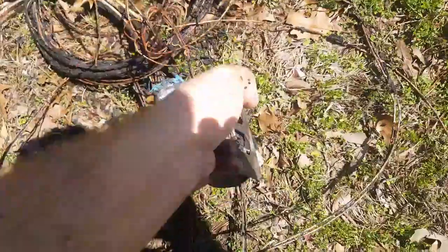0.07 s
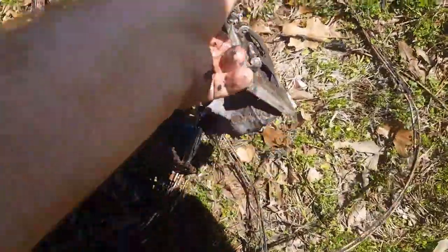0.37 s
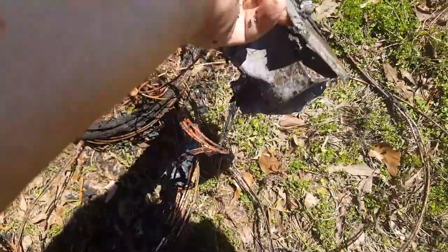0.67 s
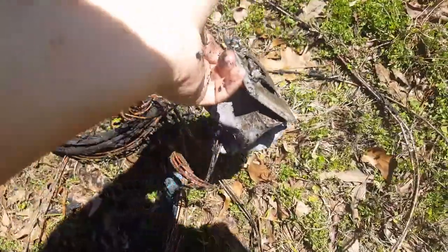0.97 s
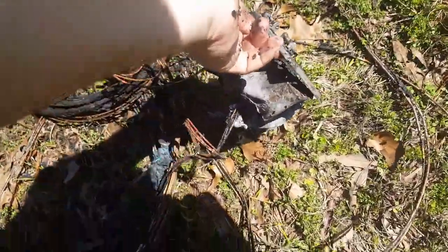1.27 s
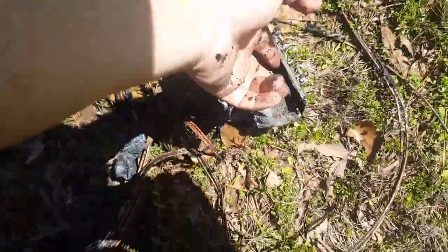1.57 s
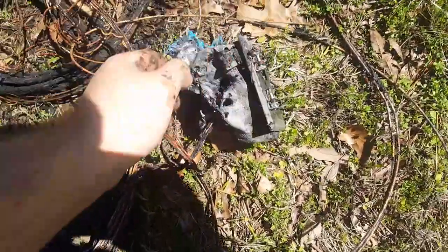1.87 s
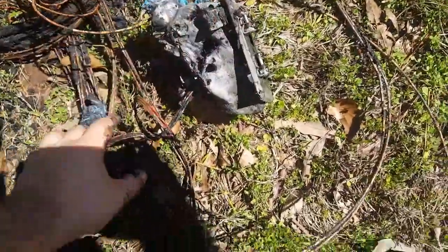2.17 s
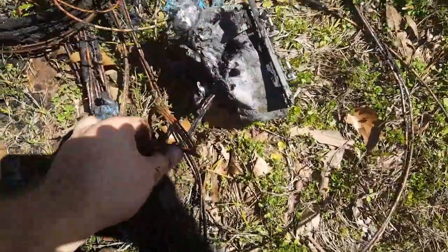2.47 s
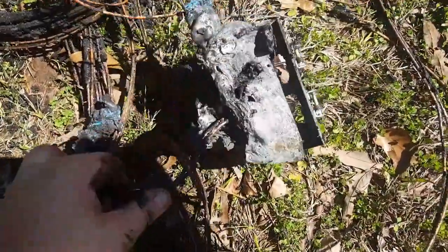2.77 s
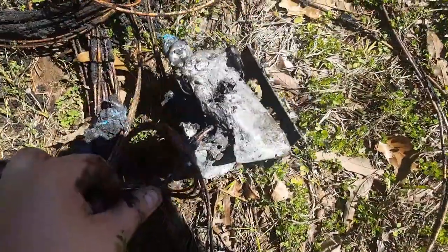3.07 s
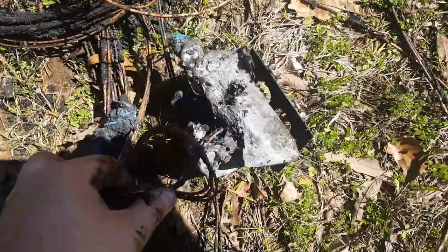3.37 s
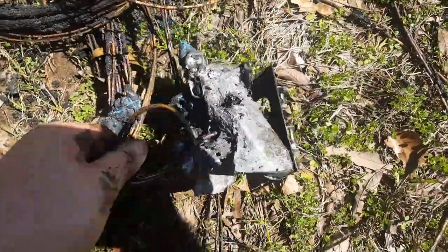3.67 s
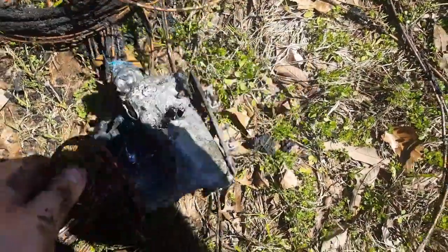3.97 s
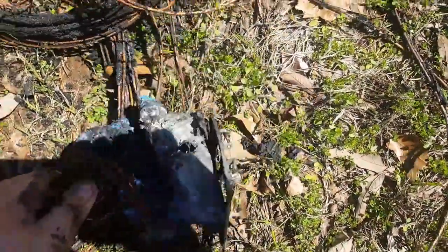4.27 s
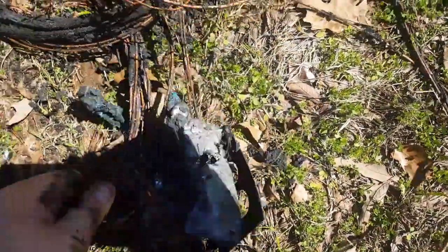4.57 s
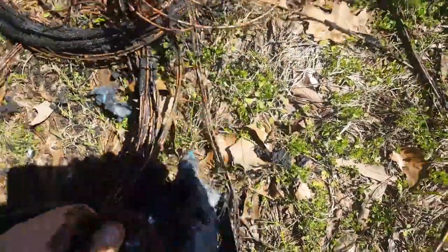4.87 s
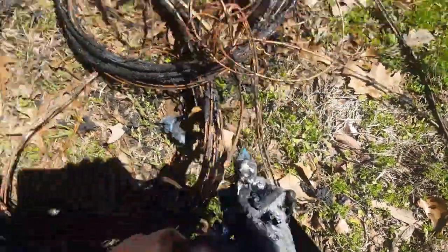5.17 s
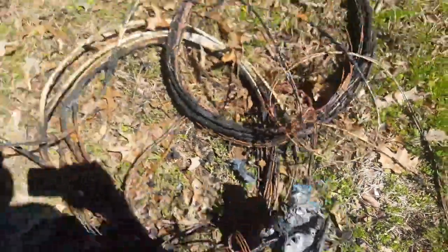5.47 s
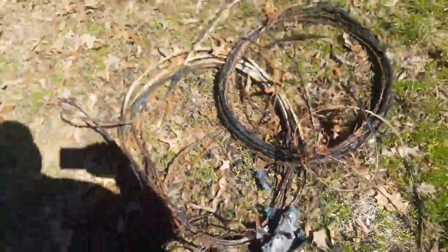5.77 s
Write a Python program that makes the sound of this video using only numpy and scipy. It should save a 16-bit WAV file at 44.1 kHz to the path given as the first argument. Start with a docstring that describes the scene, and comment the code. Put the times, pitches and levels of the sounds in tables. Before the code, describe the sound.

Close up outdoors, a stiff burnt cable and a charred metal box are moved over dry leaves and grass, with light rustling, thin crackles, a faint scrape and soft thuds. The cable is then twisted, and its brittle crust snaps and crumbles in a loud, dense run that makes the box ring briefly. Finally it drops into the leaves with a crunch. A light breeze rumbles on the microphone throughout.

```python
"""Burnt cable on dry leaves

A stiff, burnt cable and the charred metal box at its end are handled on dry leaves and grass, up close.
Leaves rustle and stalks splinter; the box scrapes and rings as it is set down, amid soft thuds.
The cable is twisted: its brittle crust snaps and crumbles, ringing the box. Then it drops into the leaves.
A light breeze rumbles on the microphone throughout."""
import sys
import numpy as np
from scipy import signal
from scipy.fft import rfft, irfft, next_fast_len
from scipy.io import wavfile
from scipy.ndimage import uniform_filter1d, map_coordinates

SR = 44100
rng = np.random.default_rng(int(sys.argv[2]) if len(sys.argv) > 2 else 0)


def wav_out(sig):
    """Save sig, one row per channel (or a flat mono array), as 16-bit PCM at SR to the path in sys.argv[1]."""
    wavfile.write(sys.argv[1], SR, np.round(np.clip(np.atleast_2d(sig).T, -1, 1) * 32767).astype(np.int16))


N = 265173
HIT_SAMPLES = 8192

# Fine treble of leaves and crust. Each row: frequency in Hz, relative level in dB.
CRISP_SPECTRUM = [(3400, -25), (4400, -1), (5500, -4), (7300, -8.5), (9200, -6.5), (11000, -9.5),
                  (13500, -8.5), (15000, -10)]
# The bright edge of a crack or scrape. Each row: frequency in Hz, bandwidth in Hz, relative level in dB.
CRACK_MODES = [(5050, 2100, 8), (10100, 930, 2.5), (13600, 1600, -1.5)]
# The ring of the crusted box. Each row: frequency in Hz, bandwidth in Hz, relative level in dB.
BOX_MODES = [(1250, 64, -6), (1649, 172, -2), (1870, 113, 1), (2232, 123, -2.5), (2536, 176, -9),
             (3380, 610, -13), (4074, 105, -7.5)]
# The knock of its broad panels. Each row: frequency in Hz, bandwidth in Hz, relative level in dB.
PANEL_MODES = [(210, 50, -17), (380, 140, -15), (670, 100, 0), (1000, 380, -4)]


def amp(db):
    """Decibels to gain."""
    return 10 ** (np.asarray(db) / 20)


def unit(x):
    """Scale to rms 1."""
    return x / np.sqrt(np.mean(x ** 2) + 1e-20)


def wobble(rate):
    """A smooth random curve with `rate` knots a second."""
    return map_coordinates(rng.standard_normal(int(N * rate / SR) + 4), [np.arange(N) * rate / SR])


def pan(db):
    """Channel gains for a left-right level difference; negative leans right."""
    return amp([[db / 2], [-db / 2]])


def filtered(x, response):
    """Filter x by a complex response, given as a function of Hz."""
    size = x.shape[-1]
    padded = next_fast_len(size + HIT_SAMPLES)
    return irfft(rfft(x, padded) * response(np.fft.rfftfreq(padded, 1 / SR)), padded)[..., :size]


def left_first(x, lead_ms):
    """Let the sound reach the left channel just ahead of the right."""
    return filtered(x, lambda hz: np.exp(2j * np.pi * hz * lead_ms / 1000 * np.array([[.5], [-.5]])))


def equalised(x, curve):
    """Shape x with an EQ curve of (Hz, dB) points."""
    hz, db = np.transpose(curve)
    return filtered(x, lambda f: amp(np.interp(np.log(f + 1), np.log(hz), db)))


def ring(x, modes, vary_db=0, detune=0):
    """Ring resonances with x, at rms 1; scatter in strength and pitch stands for the point struck."""
    chance = rng.standard_normal((len(modes), 2))
    struck = [(hz * np.exp(detune * a), width, amp(db + vary_db * b))
              for (hz, width, db), (a, b) in zip(modes, chance)]
    return unit(filtered(x, lambda f: sum(
        (-1) ** k * gain * 1j * f * width / (hz * hz - f * f + 1j * f * width)
        for k, (hz, width, gain) in enumerate(struck))))


def noise(alike):
    """Stereo white noise; `alike` is the share of power common to both channels."""
    return np.sqrt(alike) * rng.standard_normal(N) + np.sqrt(1 - alike) * rng.standard_normal((2, N))


def grains(rate, spread_db, clump_db, bed_db, alike):
    """Tiny fractures, about `rate` a second and a millisecond each, clumping over a bed of hiss."""
    size_db = spread_db * np.minimum(rng.exponential(size=N), 3)
    starts = (rng.random(N) < rate / SR) * amp(size_db)
    energy = signal.lfilter([1], [1, -np.exp(-1 / (0.00049 * SR))], starts ** 2)
    envelope = np.hypot(unit(np.sqrt(energy)), amp(bed_db))
    return unit(envelope * noise(alike) * amp(clump_db * wobble(70)))


def jolt(run_t60, run_db, shiver_t60, shiver_db):
    """The force of one break or scrape: a sharp release, a ragged run and a shiver of loose bits."""
    t = np.arange(HIT_SAMPLES) / SR
    release = 1. * (t == 0)
    ragged = amp(4 * np.repeat(rng.standard_normal(HIT_SAMPLES // 32), 32))
    build_up = 1 - np.exp(-t / (0.061 * run_t60))
    run = ragged * rng.standard_normal(HIT_SAMPLES) * amp(-60 * t / run_t60) * build_up
    shiver = rng.standard_normal((2, HIT_SAMPLES)) * amp(-60 * t / shiver_t60)
    return unit(release) + amp(run_db) * unit(run) + amp(shiver_db) * unit(shiver)


def add(track, start, sound, db):
    """Mix a sound in at `start` seconds, its loudest 3 ms at the given level."""
    loudest = np.sqrt(uniform_filter1d(np.mean(sound ** 2, axis=0), size=130, mode="constant").max())
    part = track[:, round(start * SR):][:, :sound.shape[-1]]
    part += (amp(db) * sound / loudest)[:, :part.shape[-1]]


def gestures(rows, attack_db_per_s=257, release_db_per_s=208):
    """Gain of a run of moves: each sets in fast, fades (swells if its fade is negative), then dies."""
    t, power = np.arange(N) / SR, np.zeros(N)
    for start, length, db, fade in rows:
        before = np.maximum(start - t, 0)
        during = np.clip(t - start, 0, length)
        after = np.maximum(t - start - length, 0)
        power += amp(db - attack_db_per_s * before - fade * during - release_db_per_s * after) ** 2
    return np.sqrt(power)


def cable_motion():
    """How hard the cable stirs the leaves and how hard its crust is worked; the final drop does both."""
    # Pulls through the leaves, and twists that crumble the crust.
    # Each row: start in seconds, length in seconds, drive in dB, fade in dB per second.
    pulls = [(0, 0.758, -46.5, 7), (.86, 0.36, -51.5, 3.5), (1.34, .36, -60, -17), (1.82, 0.15, -51, 23),
             (2.22, .2, -61, 16), (2.51, 0.49, -51.5, -4), (3.05, 0.31, -60, 4), (3.61, 1.45, -47, 0.5),
             (5.12, 0.27, -51, 0.5)]
    twists = [(3.92, 0.1, -37.5, 12), (4.12, 0.44, -38, 8.5), (4.59, 0.21, -33, 7),
              (4.88, 0.047, -38.5, 25)]
    drop_s, rise_db_per_s, fall_db_per_s = 5.637, 105, 61
    since_drop = np.arange(N) / SR - drop_s
    drop = amp(-37.5 - np.maximum(-rise_db_per_s * since_drop, fall_db_per_s * since_drop))
    resting = amp(-61)
    stir = np.sqrt(gestures(pulls) ** 2 + drop ** 2 + resting ** 2)
    twist = np.hypot(gestures(twists), amp(-17) * drop)
    return stir, twist


def rustle(drive):
    """Dry leaves crackle and bare wire strands tick as the cable moves."""
    # The body of the leaves. Each row: frequency in Hz, relative level in dB.
    leaf_spectrum = [(450, -24), (800, -13), (1200, -4), (1800, 1), (2400, -1), (3000, -4), (3750, -2),
                     (4500, -9), (5500, -24), (9000, -60)]
    # The ring of the strands. Each row: frequency in Hz, bandwidth in Hz, relative level in dB.
    wire_modes = [(1155, 130, 3), (1810, 120, 7.5), (2660, 133, 6.5), (3655, 140, 2.5)]
    leaf_grains = grains(rate=700, spread_db=3.8, clump_db=1.7, bed_db=0, alike=.25)
    wire_grains = grains(rate=110, spread_db=3.5, clump_db=2.5, bed_db=-7, alike=.15)
    fine_grains = grains(rate=170, spread_db=3, clump_db=1.16, bed_db=4.5, alike=0.014)
    leaves = unit(equalised(leaf_grains, leaf_spectrum)) * pan(-5)
    wires = ring(wire_grains, wire_modes) * pan(-5)
    crisp = unit(equalised(fine_grains, CRISP_SPECTRUM)) * pan(-7)
    return drive * (amp(1.5) * leaves + amp(-6) * wires + crisp)


def hand_rub(effort):
    """Dull friction of hand on cable, growing 0.43 dB for each dB of effort."""
    # The low colour of the rubbing. Each row: frequency in Hz, relative level in dB.
    rub_spectrum = [(60, -14), (110, -1.5), (170, -5), (260, -4.5), (340, -2), (500, -8.5), (720, -6),
                    (950, -8), (1400, -31)]
    rub_db = -56.5 + 0.43 * (20 * np.log10(effort) + 48)
    friction = grains(rate=210, spread_db=6, clump_db=2, bed_db=1.5, alike=0.72)
    return amp(rub_db) * unit(equalised(friction, rub_spectrum)) * pan(-0.1)


def breeze():
    """Light air rumbles on the microphone: a wavering rumble that swells three times as the microphone is
    moved."""
    # The rumble of the air. Each row: frequency in Hz, relative level in dB.
    wind_spectrum = [(12, -37), (25, -5), (40, 2.5), (65, 2), (90, 1), (130, -3), (200, -11.5),
                     (350, -34.5)]
    # Each row: start in seconds, length in seconds, swell strength in dB, fade in dB per second.
    swells = [(.5, 0.75, -55.5, 4.5), (1.48, .3, -62.5, 10), (5.3, .4, -52, 2)]
    rumble = unit(equalised(noise(alike=0.4), wind_spectrum))
    waver = amp(2 * wobble(5))
    return np.hypot(amp(-62), gestures(swells)) * rumble * waver * pan(-3)


def stalk_ticks():
    """Dry stalks and leaves splinter with thin, short crackles."""
    # Each row: start in seconds, level in dB, crack against stalk in dB, splintering t60 in seconds.
    breaks = [(0.044, -31.5, -0.5, 0.01), (.272, -35, 7, 0.0096), (.293, -38, 1, 0.13),
              (.983, -45, -16, 0.031), (1.086, -39, -2, 0.011), (1.143, -42, 1, .026), (1.187, -50, 9, .02),
              (1.247, -44.5, 3, .02), (1.335, -43.5, -12, 0.011), (1.625, -40.5, -5, 0.11),
              (1.662, -33, 6, 0.01), (1.668, -27.5, -10, 0.0032), (1.869, -39.5, 2, .017),
              (1.889, -35, -8.5, 0.011), (2.232, -42.5, -7.5, .055), (2.286, -47, -15, 0.026),
              (2.326, -39.5, -22, 0.014), (2.69, -36.5, 0, 0.091), (2.786, -37.5, -6, 0.0095),
              (2.909, -32.5, 3, 0.017), (2.94, -31, 1, 0.02), (3.135, -38.5, -6, 0.0058),
              (3.3, -47, -13, 0.023), (5.044, -37.5, 4, 0.027), (5.604, -29, -31, 0.018),
              (5.631, -30, -9, .018), (5.675, -23, -3, 0.068)]
    # The ring of a dry stalk. Each row: frequency in Hz, bandwidth in Hz, relative level in dB.
    stalk_modes = [(1350, 500, -5), (1850, 450, 0), (2550, 600, -1), (3800, 900, -3)]
    out = np.zeros((2, N))
    for start, db, crack_db, run_t60 in breaks:
        force = jolt(run_t60, run_db=4, shiver_t60=0.086, shiver_db=-1)
        stalk = ring(force, stalk_modes, vary_db=3, detune=.08)
        crack = amp(crack_db) * ring(force, CRACK_MODES, vary_db=6, detune=0.113) * pan(-1)
        add(out, start, (stalk + crack) * pan(-9.5), db)
    return out


def box_slide():
    """The box scrapes over the ground, and the friction sounds its hollow."""
    # Each row: start in seconds, length in seconds, level in dB, fade in dB per second.
    slides = [(.22, 0.42, -54.5, 9), (1.04, 0.32, -56.5, 32), (1.82, 0.17, -56, 13)]
    # The hollow of the box. One row: frequency in Hz, bandwidth in Hz, relative level in dB.
    hollow = [(322, 194, 0)]
    scrape = grains(rate=180, spread_db=5, clump_db=2, bed_db=4, alike=0.95)
    return gestures(slides) * ring(ring(scrape, hollow), hollow)  # twice, for steeper skirts


def soft_bumps():
    """Hand, box and ground meet softly: a damped low mode and one brief overtone."""
    # Each row: start in seconds, level in dB, pitch in Hz, t60 of the low mode in seconds.
    contacts = [(1.032, -43.5, 430, .017), (1.065, -39.5, 105, 0.16), (1.386, -50, 405, 0.021),
                (1.832, -40, 640, 0.017), (1.889, -41.5, 745, 0.022), (2.234, -40.5, 875, 0.0087),
                (2.347, -44, 616, 0.0027), (3.984, -32, 430, 0.013), (4.168, -44.5, 210, .056),
                (4.334, -42.5, 199, .1), (4.659, -42, 220, 0.07), (4.022, -44, 564, .015),
                (4.591, -35, 473, 0.012), (4.78, -44, 184, 0.11), (4.923, -36, 401, 0.028),
                (5.419, -38.5, 870, 0.0093), (5.68, -39.5, 244, 0.048), (5.8941, -30, 428, 0.014)]
    out, t = np.zeros((2, N)), np.arange(HIT_SAMPLES) / SR
    attack = 1 - np.exp(-t / 0.00096)
    for start, db, hz, t60 in contacts:
        phase = 2 * np.pi * hz * t
        overtone = amp(8.5 - 60 * t / 0.01) * np.sin(2.41 * phase)
        thud = (np.sin(phase) + overtone) * amp(-60 * t / t60) * attack
        add(out, start, thud * pan(-7), db)
    return out


def scrapes_and_snaps():
    """The box scrapes and rings as it is set down; later its crust snaps and crunches."""
    # Two scrapes of the box, then the snaps of the crust.
    # Each row: start in seconds, level in dB, trim of the bright edge in dB, t60 of the run in seconds.
    hits = [(1.614, -40.5, -9, 0.077), (1.67, -34.5, -5, 0.0077), (3.801, -30.5, -25, 0.024),
            (3.864, -31.5, -27, 0.031), (3.884, -24, -29, 0.0077), (3.939, -11, -23, 0.0066),
            (3.986, -25, -29, 0.037), (4.006, -19, -9, 0.0064), (4.022, -13.5, -27, 0.024),
            (4.038, -20, -29, .01), (4.086, -26, -9, 0.027), (4.12, -13.5, -8, 0.022),
            (4.168, -15, -7, 0.0073), (4.19, -24.5, -24, 0.017), (4.201, -21.5, -31, 0.0064),
            (4.238, -21, -11.5, 0.024), (4.246, -23, -6, .013), (4.267, -15, -11.5, 0.042),
            (4.29, -17, -10, 0.014), (4.332, -15, -12, 0.0079), (4.387, -21.5, -17, 0.045),
            (4.422, -11, -13, 0.011), (4.437, -21, -10, 0.016), (4.469, -23.5, -7, 0.03),
            (4.534, -22, -12, 0.0052), (4.589, -15.5, -14, 0.028), (4.616, -22.5, -1, 0.024),
            (4.66, -13, -12, 0.0044), (4.685, -30, 1, 0.049), (4.715, -21.5, -4, 0.029),
            (4.749, -13.5, -11.5, 0.021), (4.761, -15.5, -9, 0.0098), (4.776, -18.5, -11, 0.017),
            (4.784, -23, -6, 0.012), (4.799, -20, -8, 0.01), (4.807, -15, -20, 0.0046),
            (4.923, -15, -16.5, 0.039), (4.948, -31, -7, 0.026), (4.993, -28, -26, 0.013),
            (5.027, -31.5, -1, 0.025), (5.137, -33, -26, 0.0091), (5.148, -39, -18, 0.0097),
            (5.628, -27.5, 11, 0.037), (5.667, -24, -10, 0.044), (5.682, -18.5, 0.5, 0.028),
            (5.7, -19, -8.5, 0.01)]
    out = np.zeros((2, N))
    for start, db, edge_db, run_t60 in hits:
        run_db = 20 * np.log10(run_t60 / 0.03)  # a longer run buries the first release
        knock_db = -13 + 0.61 * run_db  # and knocks the panels harder
        force = jolt(run_t60, run_db, shiver_t60=.07, shiver_db=-11)
        body = ring(force, BOX_MODES, vary_db=2, detune=.04)
        knock = amp(knock_db) * ring(force, PANEL_MODES, vary_db=3, detune=0.026)
        rasp = jolt(2 * run_t60, run_db=25.5, shiver_t60=0.049, shiver_db=21)
        edge = amp(edge_db + 1) * ring(rasp, CRACK_MODES, vary_db=4, detune=.08) * pan(-4)
        add(out, start, (body + knock + edge) * pan(-6.5), db)
    return left_first(out, lead_ms=0.077)


def crust_crumble(twist):
    """Twisting sheds crumbs of crust that rattle through the box, with fine grit on top."""
    crumbs = grains(rate=400, spread_db=4.4, clump_db=3, bed_db=-4, alike=.65)
    box = ring(crumbs, BOX_MODES) + amp(-13) * ring(crumbs, PANEL_MODES)
    rattle = left_first(box, lead_ms=0.099) * pan(-2.5)
    grit = unit(equalised(left_first(crumbs, lead_ms=0.15), CRISP_SPECTRUM)) * pan(-15)
    return twist * (amp(1.9) * rattle + amp(-9.5) * grit)


def scene():
    """Open air: every sound arrives dry."""
    stir, twist = cable_motion()
    foliage = rustle(stir + amp(-5.5) * twist)  # twisting stirs the leaves too
    bed = foliage + hand_rub(np.hypot(stir, twist)) + breeze()
    return bed + stalk_ticks() + box_slide() + soft_bumps() + scrapes_and_snaps() + crust_crumble(twist)


def record(dry):
    """The microphone's two ports differ in colour; peaks are rounded, deep bass and top treble cut."""
    # The right port's colour beside the left. Each row: frequency in Hz, gain in dB.
    right_port_eq = [(2000, -0.5), (2600, -1), (3200, 0.5), (3900, 2), (5000, -3.5), (7000, -0.5),
                     (10000, -0.5), (14000, 0)]
    ceiling, low_hz, top_hz = .95, 48, 14750
    ports = np.array([dry[0], equalised(dry[1], right_port_eq)])
    limited = ports / (1 + np.abs(ports / ceiling) ** 6) ** (1 / 6)
    low_cut = signal.sosfilt(signal.butter(2, low_hz, "high", fs=SR, output="sos"), limited)
    return filtered(low_cut, lambda hz: 1 / (1 + (hz / top_hz) ** 160))


dry = scene()
out = record(dry)
wav_out(out)
```